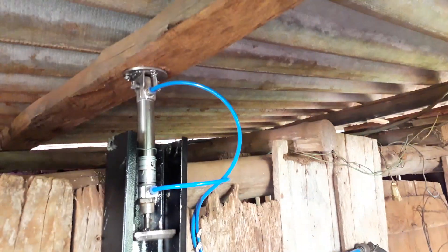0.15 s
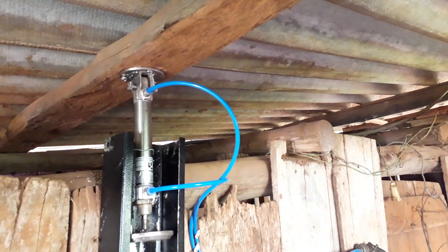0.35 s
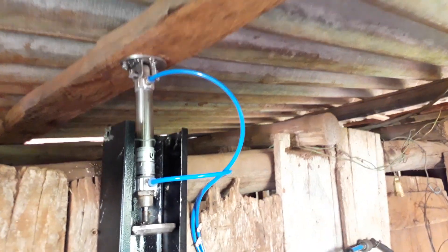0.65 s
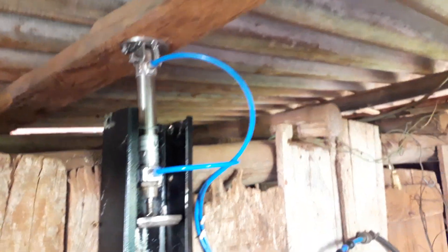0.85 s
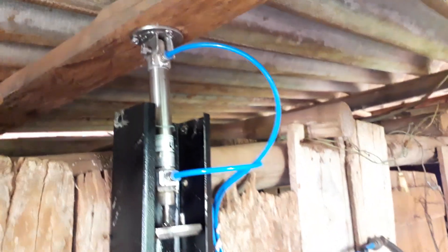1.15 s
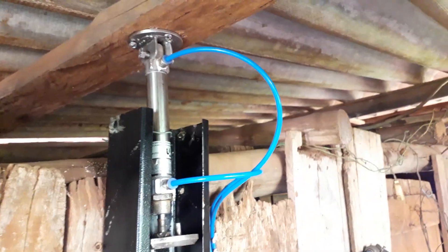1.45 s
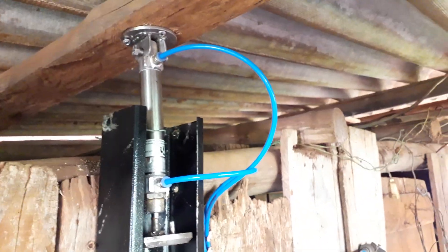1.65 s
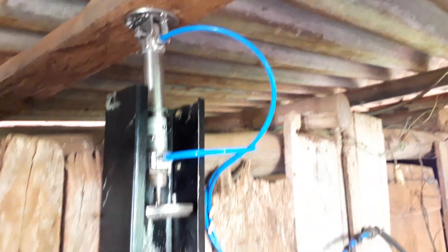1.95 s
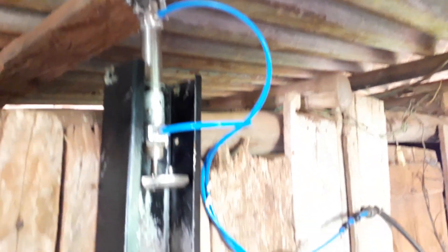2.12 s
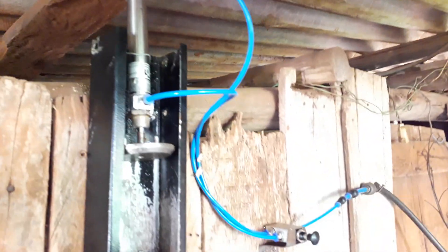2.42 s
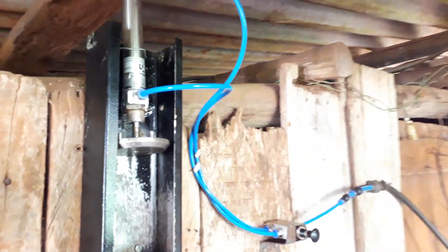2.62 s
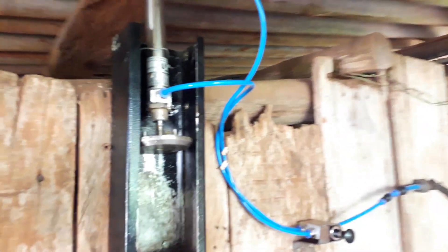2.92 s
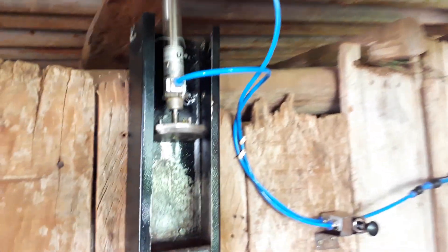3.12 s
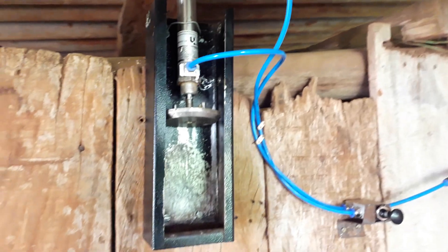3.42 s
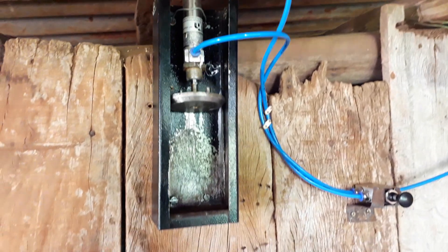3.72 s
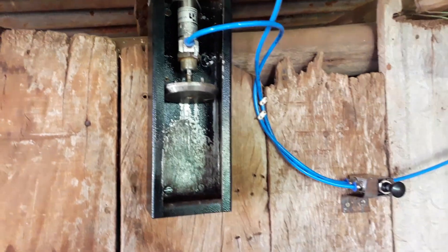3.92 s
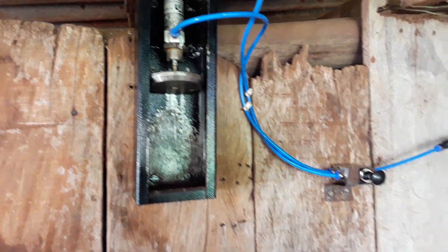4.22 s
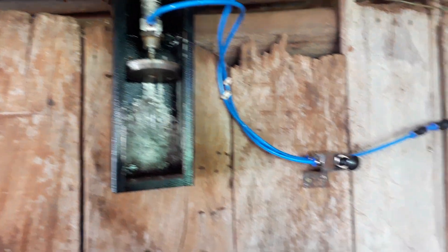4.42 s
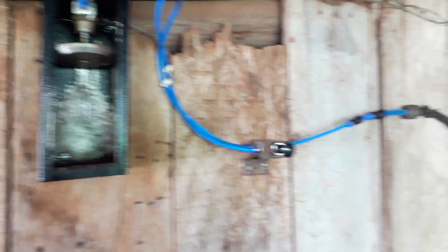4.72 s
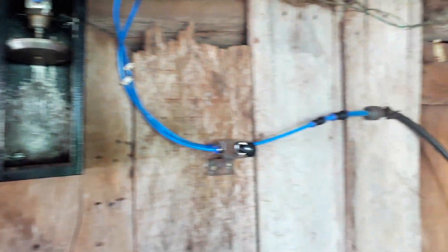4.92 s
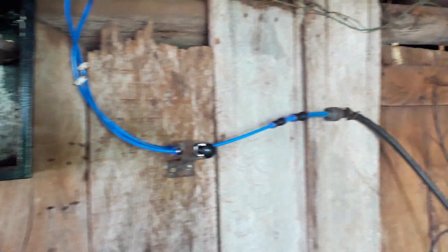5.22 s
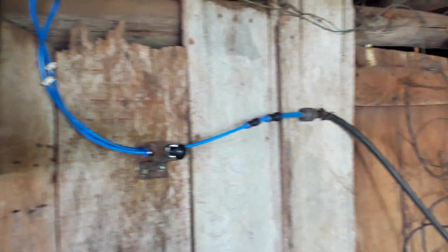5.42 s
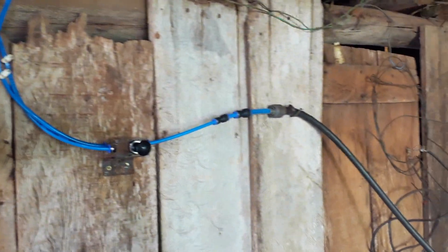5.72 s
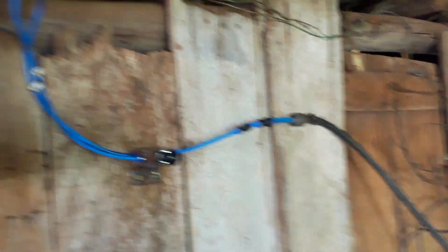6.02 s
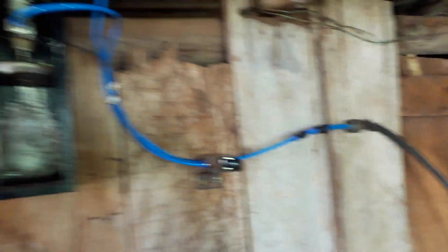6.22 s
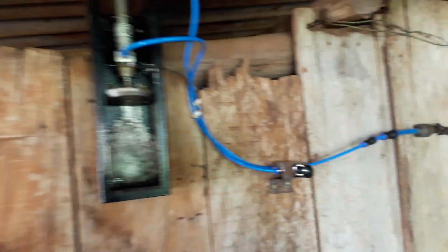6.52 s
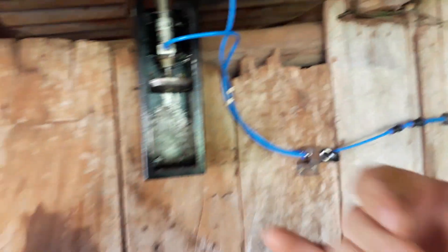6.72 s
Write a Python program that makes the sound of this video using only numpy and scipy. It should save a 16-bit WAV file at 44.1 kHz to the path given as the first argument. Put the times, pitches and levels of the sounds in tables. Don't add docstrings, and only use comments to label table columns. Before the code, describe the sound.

From the very start, compressed air hisses loudly and continuously from a leaking valve in a small wooden shed. The hiss is bright, with little bass, and slightly fluttering; hollow bands glide slowly downward through it as the hand-held microphone moves. A narrow, breathy whistle around 5 kHz sits inside it, dipping near 0.75 s, returning by 1 s and gone by about 2.3 s. The hiss stays strong, weakening slightly before 5.17 s, when the valve shuts with a short woody knock and the air stops almost instantly, with a very brief room tail. Quiet remains: a faint low motor hum, distant insects and a slowly growing cricket trill from about 5.9 s. Small ticks, sleeve scuffs and faint plank creaks appear between 5.2 and 6.2 s. At 6.33-6.43 s a close plastic catch snaps in a rapid cluster, strongest near 6.4 s, followed by a low finger rub around 6.6 s and near-silence until the end at about 7 s.

```python
import sys
import numpy as np
from scipy import signal
from scipy.fft import rfft, irfft, next_fast_len
from scipy.io import wavfile
from scipy.ndimage import uniform_filter1d, map_coordinates

SR = 44100
rng = np.random.default_rng(int(sys.argv[2]) if len(sys.argv) > 2 else 0)


def volts_from_decibels(level):
    exponent = np.asarray(level, float) / 20
    return 10 ** exponent


def int16_out(signal):
    q = np.round(np.clip(np.atleast_2d(signal).T, -1, 1) * 32767)
    wavfile.write(sys.argv[1], SR, q.astype(np.int16))


N = 302422
SHUT_S = 5.172
TOP_HZ = 15780


def unit(x):
    return x / np.sqrt(np.mean(x ** 2) + 1e-20)


def along(points, hz):
    f, v = np.transpose(points)
    return np.interp(np.log(hz + 1), np.log(f + 1), v)


def curves(rows, t):
    s, *cols = np.transpose(rows)
    return [np.interp(t, s, c) for c in cols]


def wobble(rate):
    knots = rng.standard_normal(int(N * rate / SR) + 4)
    return map_coordinates(knots, [np.arange(N) * rate / SR])


def filtered(x, response):
    m = next_fast_len(N + SR // 2)
    return irfft(rfft(x, m) * response(np.fft.rfftfreq(m, 1 / SR)), m)[:N]


def resonant(modes):
    def response(f):
        total = 0
        for k, (centre, width, db) in enumerate(modes):
            damping = 1j * f * width
            total = total + (-1) ** k * volts_from_decibels(db) * damping / (centre * centre - f * f + damping)
        return total
    return response


def noise(response):
    return unit(filtered(rng.standard_normal(N), response))


# (frequency [Hz], level per Hz [dB])
QUIET_COLOUR = [(25, -47), (90, -13), (250, -21), (400, -33.5), (1000, -45.5), (3100, -45), (4700, -34.5),
                (7600, -38), (10500, -49.5), (15700, -49.5)]


def quiet_shed():
    return volts_from_decibels(-61.5) * noise(lambda f: volts_from_decibels(along(QUIET_COLOUR, f)))


# (frequency [Hz], width [Hz], level [dB])
MOTOR_MODES = [(115.6, 27, -1.5), (193.8, 48, -5.5), (246, 14, -2)]
# (time [s], half length [s], level [dB])
GRIPS = [
    (.9, 0.97, 18.5),
    (2.995, 1.1, 7),
    (6.548, 0.17, 16),
]


def motor():
    t = np.arange(N) / SR
    fuzz_db = -71.5 + 2.7 * wobble(9)
    for s, half, db in GRIPS:
        fuzz_db += db * np.exp(-((t - s) / half) ** 2)
    out = volts_from_decibels(fuzz_db) * noise(lambda f: resonant(MOTOR_MODES)(f) ** 2)
    for hz, db in [(118.5, -63), (240, -63.0)]:
        level = volts_from_decibels(db + 1.3 * wobble(6.3))
        out += level * np.sin(2 * np.pi * hz * t + .6 * wobble(8.9))
    return out


def chorus():
    return volts_from_decibels(-70 + 1.5 * wobble(1.9)) * noise(lambda f: resonant([(6700, 700, 0)])(f) ** 2)


def cricket():
    start_s, period_s, start_db, growth_db_per_s = 5.935, .06, -73, 5
    t = np.arange(N) / SR
    since = t - start_s
    singing = since > -period_s / 2
    pulses = np.cos(np.pi * since / period_s + .4 * wobble(6)) ** 2 * singing
    level_db = start_db + growth_db_per_s * since + 1.5 * wobble(15)
    tone = np.sin(2 * np.pi * 5450 * t + 0.87 * wobble(40))
    return np.sqrt(2) * pulses * volts_from_decibels(level_db) * tone


# (time [s], frequency [Hz], peak level [dB], 60 dB fading time [s], width [Hz])
KNOCKS = [(5.1705, 650, -25, .02, 30), (5.171, 1050, -29, .015, 30), (5.171, 190, -38, .05, 20),
          (5.171, 380, -36, .03, 60), (5.2, 1800, -61, .4, 90), (5.245, 1770, -59, .08, 40),
          (5.34, 1800, -66, .6, 60), (5.345, 500, -59, .1, 150), (5.305, 3300, -64, .03, 600),
          (5.549, 1190, -51, .17, 4), (5.549, 1143, -61, .17, 4), (5.765, 600, -55, .012, 800),
          (5.765, 2000, -51, .008, 2500), (5.376, 5000, -59, .015, 5000), (5.64, 4950, -63, .05, 100),
          (6.195, 8000, -63, .04, 600), (6.222, 4300, -65, .04, 500), (6.42, 2580, -73, .5, 80),
          (6.845, 120, -50, .1, 20), (1.18, 110, -42, .12, 60)]


def knocks():
    out, t = np.zeros(N + SR), np.arange(SR // 4) / SR
    for s, hz, db, t60, width in KNOCKS:
        blur = np.cumsum(rng.standard_normal(len(t))) * np.sqrt(2 * np.pi * width / SR)
        onset = 1 - np.exp(-t / .0015)
        ring = np.sin(2 * np.pi * hz * t + blur) * onset
        out[round(s * SR):][:len(t)] += volts_from_decibels(db - 60 * t / t60) * ring
    return out[:N]


def swell(s, length, db, rise=.25):
    times = [s, s + rise * length, s + length]
    return volts_from_decibels(db) * np.interp(np.arange(N) / SR, times, [0, 1, 0])


# (start [s], length [s], level [dB], top frequency [Hz])
SLEEVE = [
    (5.19, .24, -60, 9000),
    (5.3, .1, -66, 14000),
    (5.52, .1, -66, 13000),
    (5.64, .08, -61, 6000),
    (5.64, .07, -68, 14500),
    (5.88, .48, -68, 9500),
    (6.28, .06, -66, 15000),
    (6.6, .15, -65, 15500),
]


def sleeve():
    out = np.zeros(N)
    for s, length, db, top_hz in SLEEVE:
        def band(f):
            return 1 / (1 + (3300 / (f + 1)) ** 12) / (1 + (f / top_hz) ** 12)
        out += swell(s, length, db) * noise(band)
    return out


# (start [s], length [s], level [dB])
RUBS = [
    (5.18, .2, -63),
    (6.42, .12, -67),
    (6.515, .2, -50),
    (6.64, .24, -65),
]
# (frequency [Hz], level per Hz [dB])
CASE_COLOUR = [(18, -32), (40, -4), (244, -9), (300, -14), (540, -6), (1500, -16), (1900, -27), (5460, -30),
               (9500, -34), (12400, -60)]


def rubs():
    return sum(swell(*row) for row in RUBS) * noise(lambda f: volts_from_decibels(along(CASE_COLOUR, f)))


# (start [s], length [s], level [dB])
CREAKS = [
    (5.543, 0.12, -71),
    (5.65, .06, -77),
    (6.151, 0.1, -65),
]
# (frequency [Hz], width [Hz], level [dB])
PLANK_MODES = [(1440, 300, 0.5), (2000, 400, -1), (2600, 450, -2)]


def creaks():
    out = np.zeros(N)
    for row in CREAKS:
        out += swell(*row, rise=.06) * noise(lambda f: resonant(PLANK_MODES)(f) ** 2)
    return out


def rustle():
    return (sleeve() + rubs() + creaks()) * volts_from_decibels(1.8 * wobble(60))


# (time [s], snap level [dB], thud level [dB], scrape level [dB])
CATCH_SLIPS = [(6.3271, -35, -58, -57), (6.3330, -28, -52, -64), (6.3390, -21.5, -45, -48),
               (6.3495, -40.5, -53, -46), (6.353, -45.5, -24, -42), (6.362, -48, -35, -49),
               (6.3720, -58, -43, -55), (6.3901, -24.5, -42, -50), (6.3963, -33.5, -43, -58.5),
               (6.3978, -10, -24.5, -41.5), (6.4050, -40.5, -42.5, -54), (6.4250, -51.5, -65, -55)]
# (frequency [Hz], width [Hz], level [dB])
SHELL_MODES = [(1070, 400, -1), (2160, 550, 0), (4100, 1000, -3), (6700, 1400, -11), (8800, 900, -14),
               (13500, 2800, -19)]
# (frequency [Hz], width [Hz], level [dB])
HOLLOW_MODES = [(450, 150, 5), (1020, 550, -4)]


def catch():
    snaps, thuds, t = np.zeros(N), np.zeros(N), np.arange(SR // 20) / SR
    for s, snap_db, thud_db, scrape_db in CATCH_SLIPS:
        start = round(s * SR)
        burst = volts_from_decibels(snap_db - 3 - 60 * t / .0022)
        scrape = volts_from_decibels(scrape_db + 12 - 60 * t / 0.055)
        snaps[start:][:len(t)] += (burst + scrape) * rng.standard_normal(len(t))
        snaps[start] -= volts_from_decibels(snap_db + 19.0)
        thuds[start] += volts_from_decibels(thud_db + 37.5)

    def soft_push(f):
        return resonant(HOLLOW_MODES)(f) / (1 + 1j * f / 900) ** 2
    return filtered(snaps, resonant(SHELL_MODES)) + filtered(thuds, soft_push)


# (time [s], level [dB])
WHISTLE_LEVEL = [(0, -31), (.6, -34), (.75, -45), (1, -30), (1.7, -30), (2.05, -34), (2.25, -60),
                 (2.3, -120)]


def whistle():
    level_db, = curves(WHISTLE_LEVEL, np.arange(N) / SR)
    return volts_from_decibels(level_db) * noise(lambda f: resonant([(5195, 45, 0)])(f) ** 2)


# (time [s], log ratio [-])
ECHO_PATH = [(0.0, 0.014), (0.65, 0.029), (1.3, 0.108), (2.0, 0.13), (2.4, 0.183), (3.1, 0.215),
             (3.9, 0.275), (5.2, 0.297)]
# (middle time [s], length [s], middle frequency [Hz], level [dB])
FRINGES = [(0.33, 0.66, 9520, -5.4), (0.45, 1.15, 10590, -7.5), (0.2, 0.99, 14340, -3.2),
           (0.98, 0.48, 9070, 7.9), (1.52, 1.13, 9980, -6.4), (1.25, 1.04, 7350, 4.2),
           (1.7, 1.26, 8310, 6.8), (1.68, 1.23, 6500, -5.3), (1.63, 0.88, 12950, -4.9),
           (2.53, 2.0, 9980, -6.6), (2.62, 1.06, 9380, 5.1), (2.58, 1.08, 8280, 3.5),
           (2.98, 1.27, 11900, 2.1), (2.77, 1.14, 13370, -4.3), (3.26, 1.24, 7140, 5.8),
           (2.91, 1.46, 6530, -4.9), (4.4, 2.24, 5720, -6.0), (3.65, 1.19, 10780, -2.6),
           (4.08, 1.48, 7940, 3.3), (2.43, 1.45, 5790, 4.0), (4.8, 1.02, 8520, -2.2),
           (5.03, 0.63, 11180, -5.6), (0.31, 0.99, 11910, -0.2), (1.43, 0.8, 12020, -1.4),
           (2.2, 0.74, 10880, -2.8), (4.63, 0.8, 4640, -2.8), (0.62, 0.4, 12390, 3.7),
           (0.45, 0.98, 3020, 9.9), (0.75, 0.66, 7630, -4.9), (1.54, 1.23, 4610, -0.5)]


def echo_fringes(hz, t):
    path, = curves(ECHO_PATH, t)
    out = np.zeros((len(hz), len(t)))
    for s, length, mid_hz, db in FRINGES:
        fade = np.sqrt(np.cos(np.pi * np.clip((t - s) / length, -.5, .5)).clip(0))
        centre = mid_hz * np.exp(curves(ECHO_PATH, s)[0] - path)
        width = .037 * mid_hz
        out += db * fade * np.exp(-((hz[:, None] - centre) / width) ** 2)
    return out


def bumps(modes, hz):
    return sum(db * np.exp(-((hz - c) / w) ** 2) for c, w, db in modes)


# (frequency [Hz], level per Hz [dB])
JET_COLOUR = [(300, -25.7), (450, -25.3), (700, -21.6), (1400, -21.6), (2100, -20.1), (2900, -9.7),
              (3500, -2.3), (4500, -3.7), (5600, -0.8), (7500, -3.6), (9000, -2.1), (10500, -10.4),
              (12300, -9.5), (15700, -9.3)]
# (time [s], share turned [0-1])
AIM = [(0.0, -0.03), (0.8, 0.15), (2.0, 0.23), (2.4, 0.58), (3.2, 0.51), (3.8, 0.88), (5.2, 0.85)]
# (frequency [Hz], level [dB])
TURNED_COLOUR = [(300, -5.0), (2500, -1.4), (4000, -4.5), (6000, -1.7), (9500, -0.2), (12000, 5.8),
                 (15700, 1.1)]
# (frequency [Hz], width [Hz], level [dB])
ROOF_CAVITIES = [(440, 240, -7.4), (710, 30, 3.2), (1160, 80, 6.1), (1390, 90, 2.8), (1850, 170, 8.3),
                 (2340, 120, 5.1), (3000, 140, -6.2), (3530, 310, -12.9), (3580, 150, 10.1),
                 (4370, 170, -3.7), (5190, 90, 9.3), (12490, 220, 2.2)]
# (frequency [Hz], width [Hz], level [dB])
MIDWAY_CAVITIES = [(990, 120, 5.1), (1660, 60, 3.3), (2120, 60, 5.3), (2590, 170, 2.3), (3600, 190, -3.8),
                   (3770, 370, 4.7), (4560, 290, 4.0)]
# (frequency [Hz], width [Hz], level [dB])
WALL_CAVITIES = [(1100, 70, 8.3), (1270, 100, -2.4), (1880, 170, 6.1), (2450, 110, -1.7), (2650, 130, -7.1),
                 (3910, 280, -3.0), (4570, 240, 5.3), (5240, 120, 1.0), (5680, 310, -0.7),
                 (12320, 930, 5.1)]


def jet_colour(hz, t):
    aim, = curves(AIM, t)
    no_bass = np.maximum(260 - hz, 0) / 13
    colour = (along(JET_COLOUR, hz) - no_bass)[:, None]
    colour = colour + np.outer(bumps(ROOF_CAVITIES, hz), 1 - aim)
    colour += np.outer(bumps(WALL_CAVITIES, hz) + along(TURNED_COLOUR, hz), aim)
    colour += np.outer(bumps(MIDWAY_CAVITIES, hz), 4 * aim * (1 - aim))
    colour += echo_fringes(hz, t)
    chance = uniform_filter1d(rng.standard_normal(colour.shape), size=5, axis=0)
    chance = uniform_filter1d(chance, size=24, axis=1)
    return colour + 1.4 * unit(chance)


# (time [s], level [dB])
AIR_FLOW = [(0.0, -15), (0.01, -16), (0.29, -16), (0.72, -16.5), (1.01, -14.5), (2.02, -15.5),
            (2.56, -16.5), (3.79, -15.5), (4.44, -16.5), (5.16, -21)]


def jet():
    room_db, room_t60_s, stop_t60_s = -11, .15, .035
    hz, t, z = signal.stft(rng.standard_normal(N), SR, nperseg=2048)
    colour = jet_colour(hz, t)
    flow_db, = curves(AIR_FLOW, t)
    power = np.sum(volts_from_decibels(2 * colour[hz < TOP_HZ]), axis=0) / len(hz)
    colour += flow_db - 10 * np.log10(power)
    air = signal.istft(z * volts_from_decibels(colour), SR, nperseg=2048)[1][:N]
    after = np.maximum(np.arange(N) / SR - SHUT_S, 0)
    walls = filtered(air, lambda f: 1 / (1 + (f / 9000) ** 2))
    walls = walls * volts_from_decibels(room_db - 60 * after / room_t60_s)
    stop = volts_from_decibels(-60 * after / stop_t60_s)
    flutter = volts_from_decibels(0.087 * wobble(13) + 0.38 * wobble(150))
    return (air * stop + walls * (1 - stop)) * flutter


def scene():
    background = quiet_shed() + motor() + chorus() + cricket()
    mono = background + knocks() + rustle() + catch() + whistle() + jet()
    return np.array([mono, mono])


def side_patches(mono):
    hz, t, z = signal.stft(mono, SR, nperseg=512)
    share = np.zeros(z.shape)
    for when, where, wide in rng.random((30, 3)):
        s = SHUT_S * when ** .55
        low_hz = 4200 + 9000 * where ** 1.3
        band = (hz > low_hz) & (hz < low_hz + 1000 + 1600 * wide)
        share += volts_from_decibels(-1.5) * band[:, None] * np.exp(-((t - s) / 0.0098) ** 4)
    other = signal.stft(rng.standard_normal(N), nperseg=512)[2]
    size = np.sqrt(np.abs(uniform_filter1d(np.abs(z) ** 2, size=7, axis=0)))
    return signal.istft(share * size * other / np.std(other), nperseg=512)[1][:N]


# (frequency [Hz], level per Hz [dB])
SIDE_COLOUR = [(100, -12), (214, -1), (320, -5), (2660, -13), (5230, -2), (6200, -8), (7030, -30),
               (7810, -9), (15700, -8)]


def side_quiet():
    times = [5.22, 5.3, 6.31, 6.33, 6.43, 6.44]
    level = np.interp(np.arange(N) / SR, times, [0, 1, 1, 0, 0, 1.5])
    return volts_from_decibels(-79) * level * noise(lambda f: volts_from_decibels(along(SIDE_COLOUR, f)))


def band_limit(x):
    return signal.sosfilt(signal.butter(12, 17060, fs=SR, output="sos"), x)


def record(dry):
    side = side_patches(dry[0]) + side_quiet()

    def passband(f):
        treble_cut = (1 - np.tanh((f - TOP_HZ) / 25)) / 2
        return treble_cut / (1 + (40 / (f + 1)) ** 4)
    left = filtered(dry[0] + side, passband)
    right = filtered(dry[0] - side, passband)
    return band_limit(np.array([left, right]))


dry = scene()
out = record(dry)
int16_out(out)
```